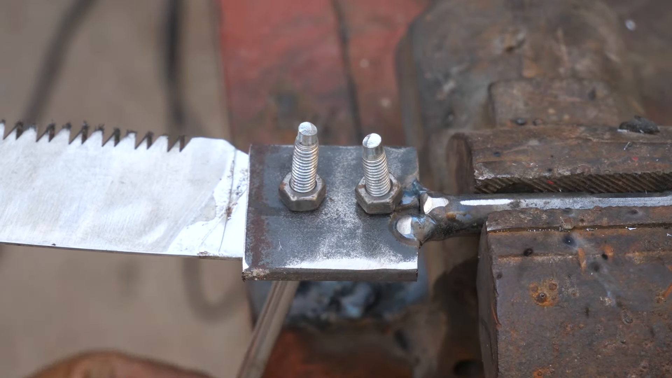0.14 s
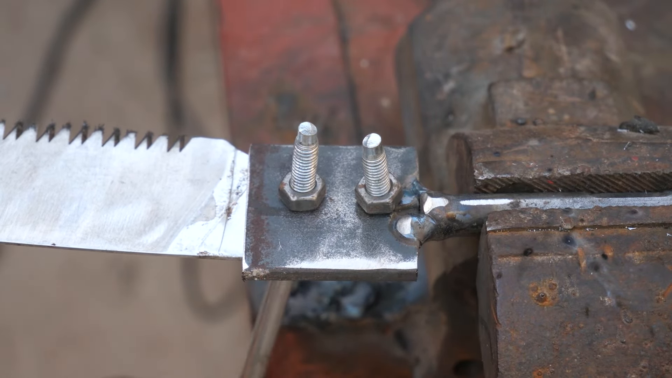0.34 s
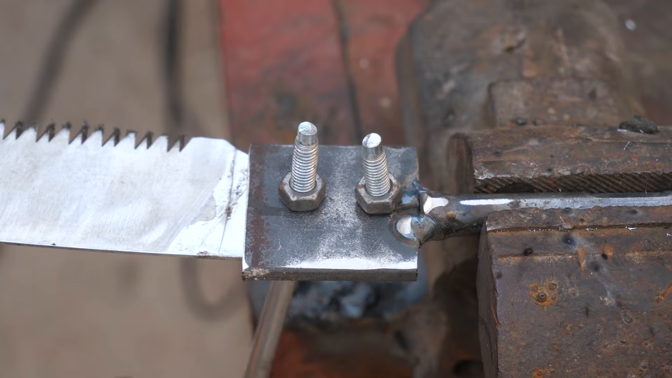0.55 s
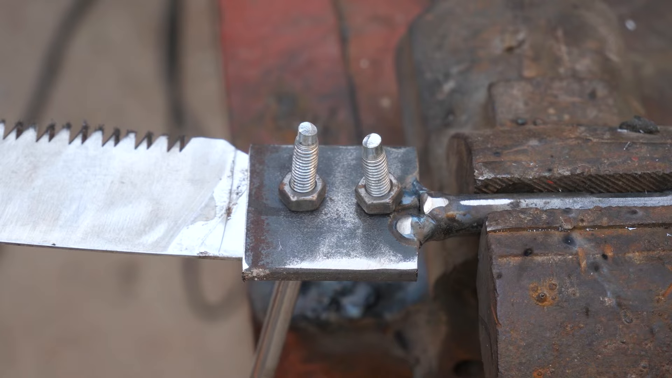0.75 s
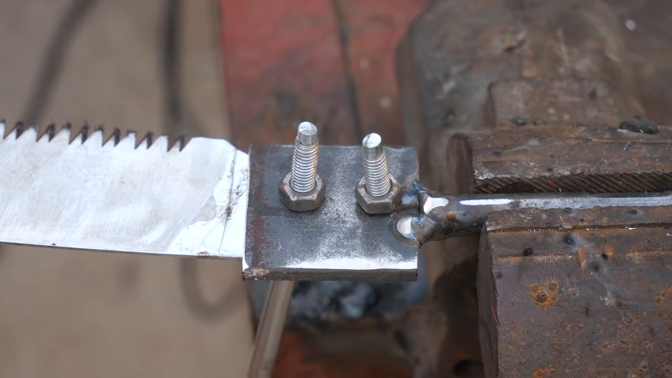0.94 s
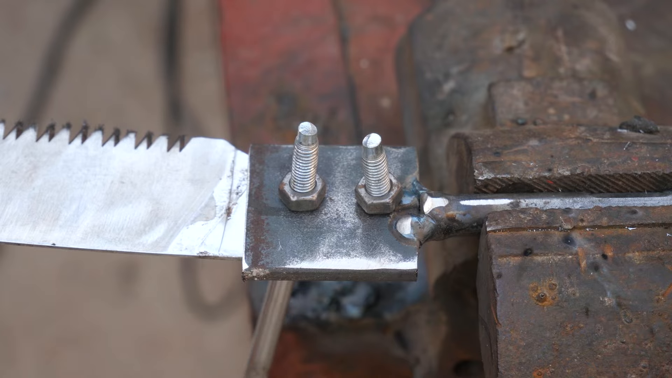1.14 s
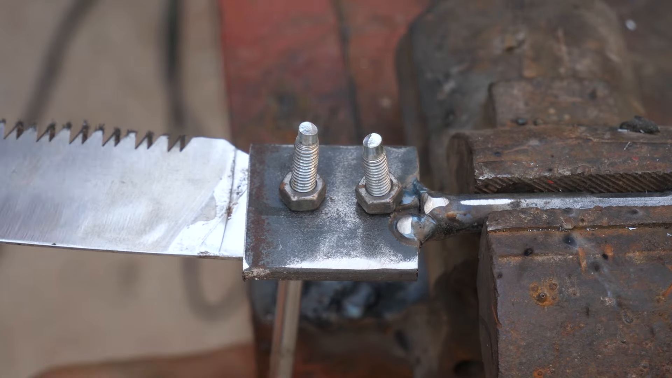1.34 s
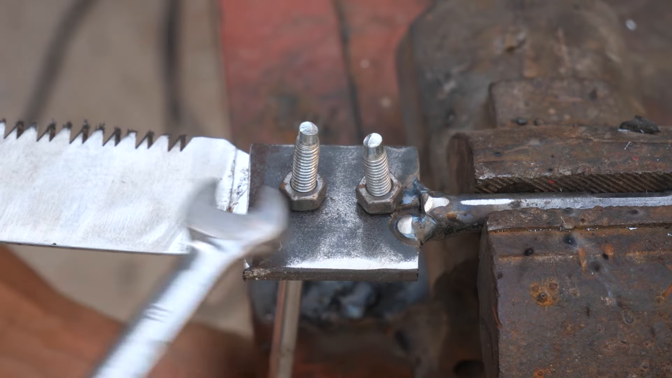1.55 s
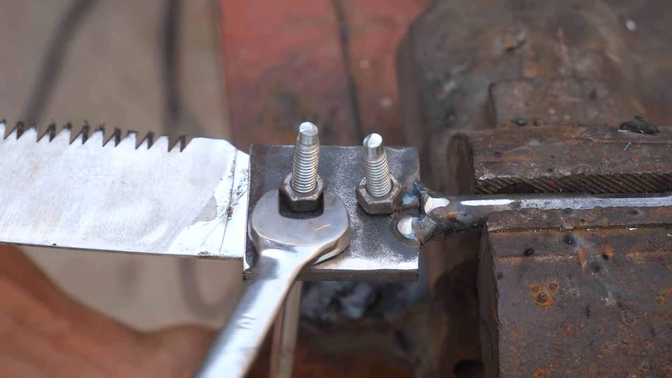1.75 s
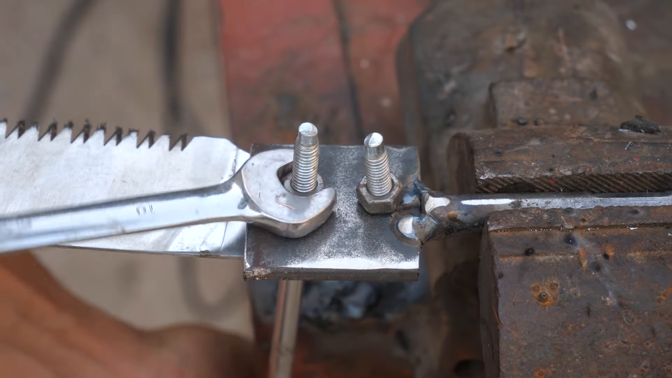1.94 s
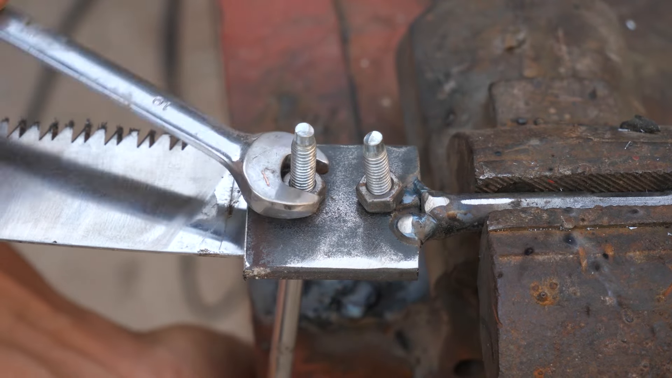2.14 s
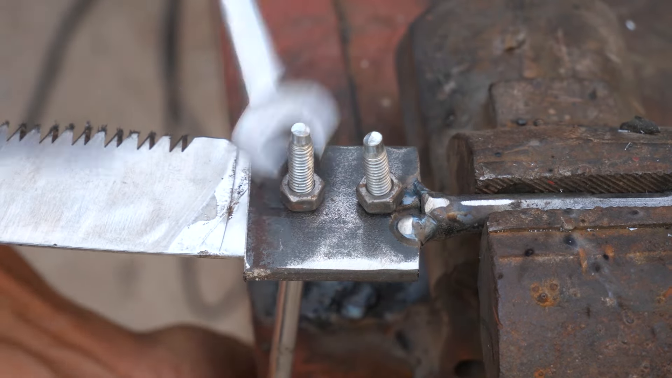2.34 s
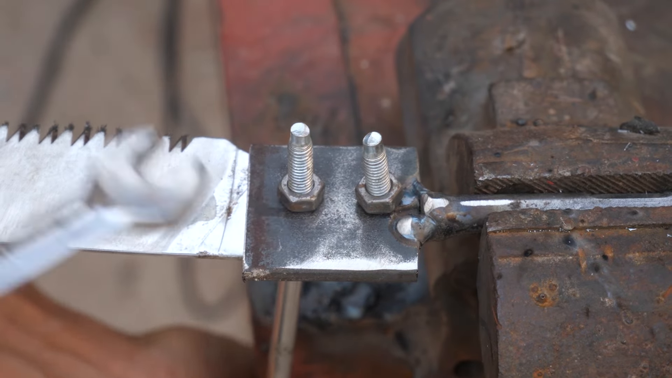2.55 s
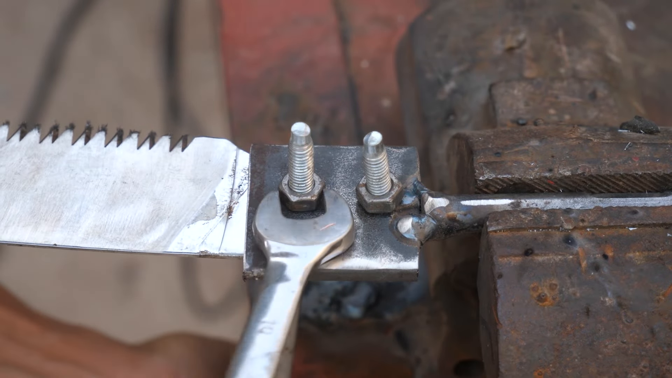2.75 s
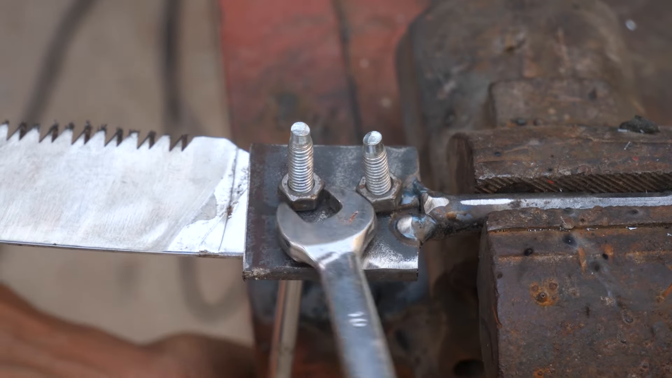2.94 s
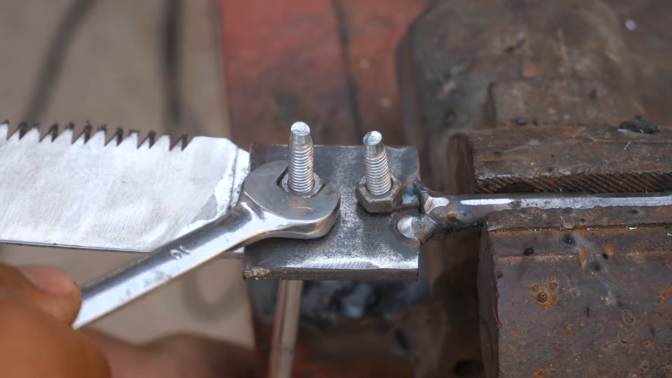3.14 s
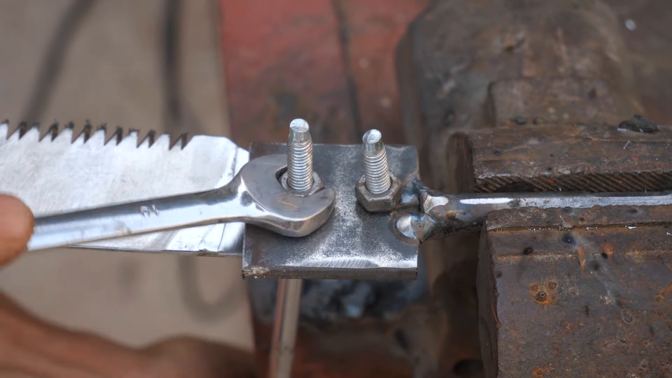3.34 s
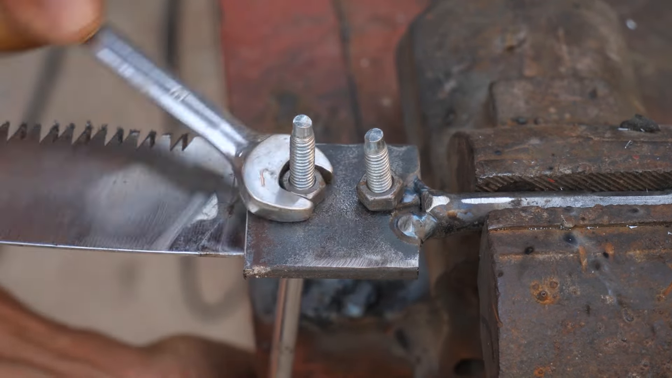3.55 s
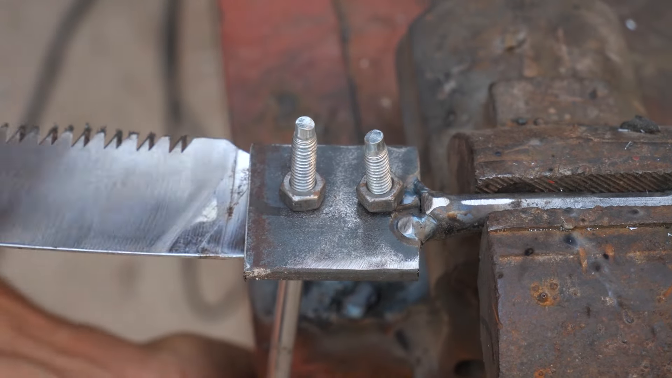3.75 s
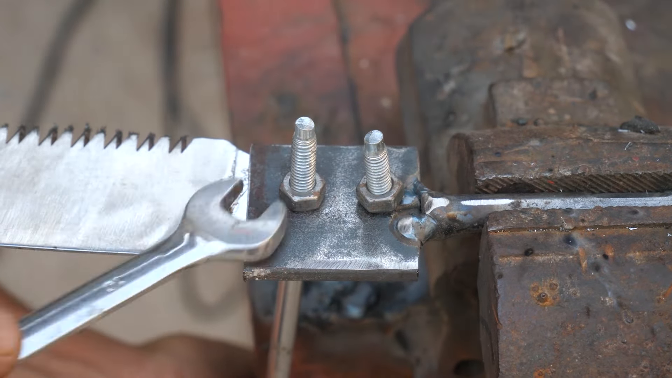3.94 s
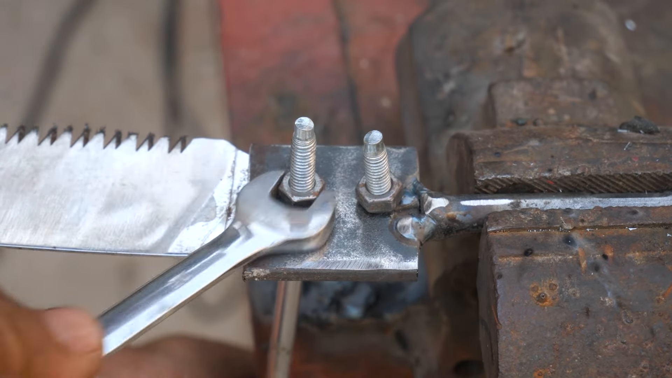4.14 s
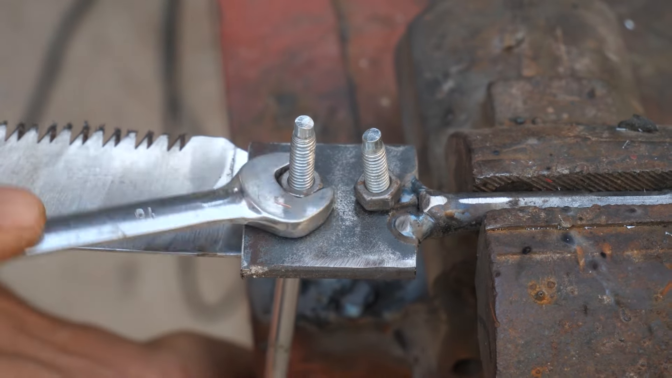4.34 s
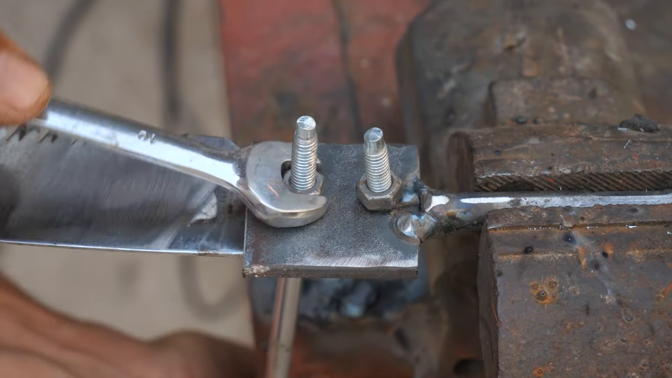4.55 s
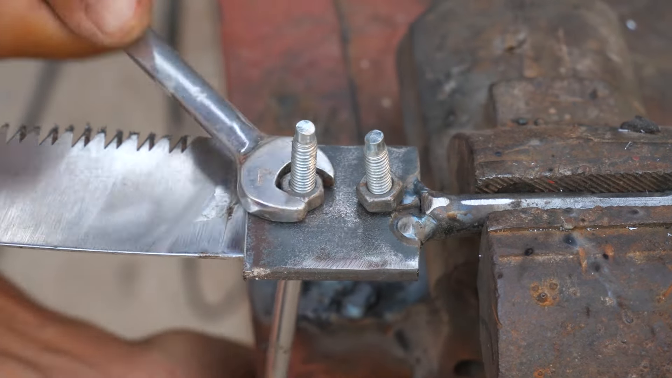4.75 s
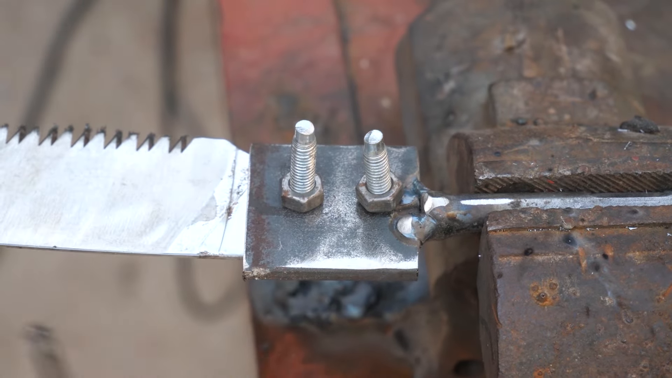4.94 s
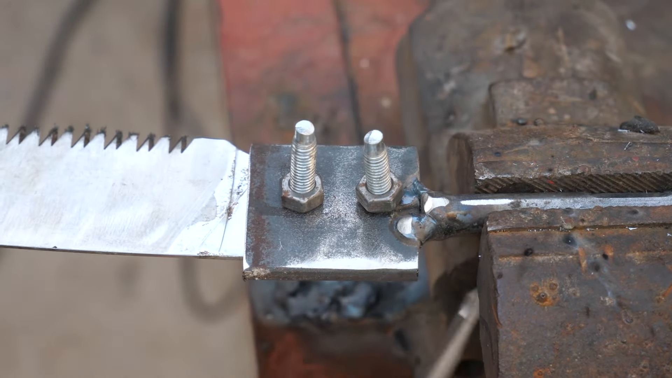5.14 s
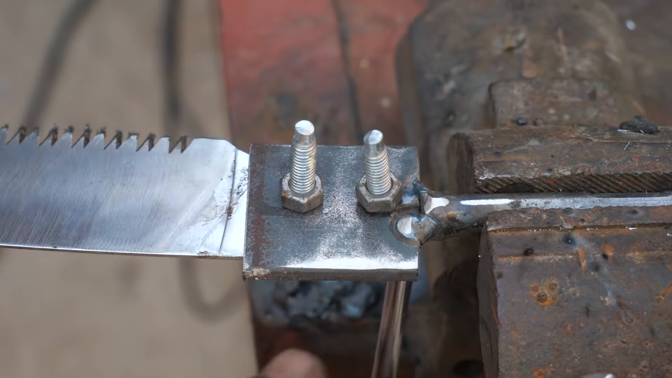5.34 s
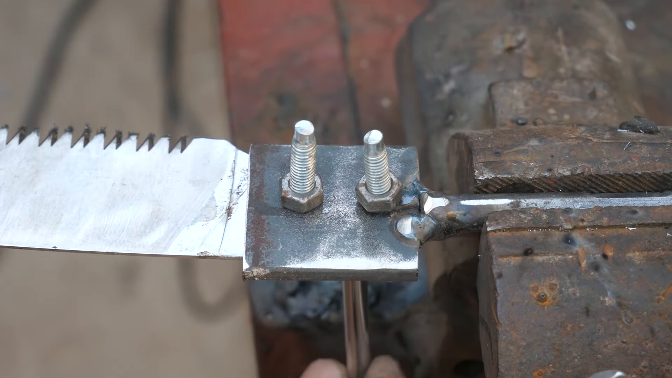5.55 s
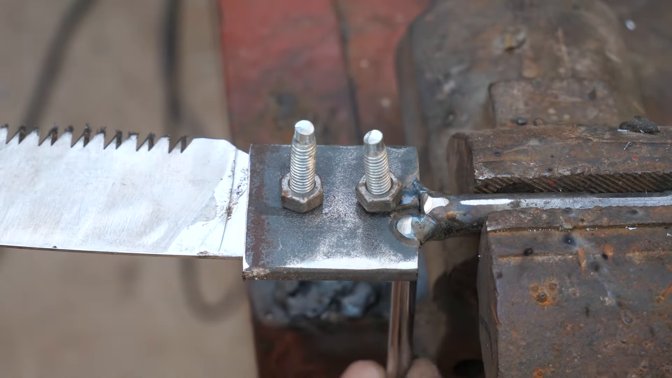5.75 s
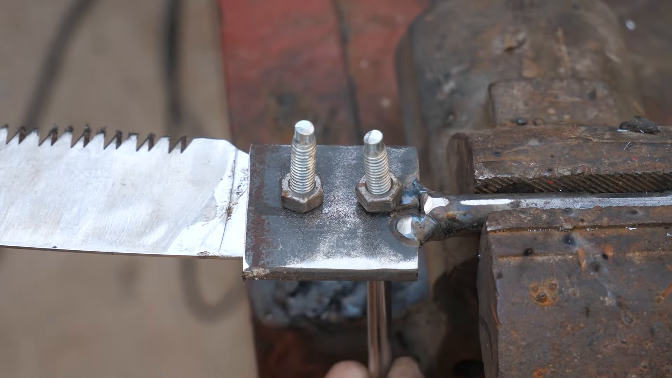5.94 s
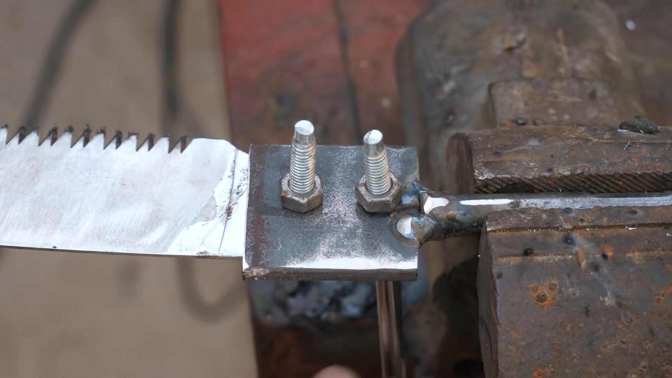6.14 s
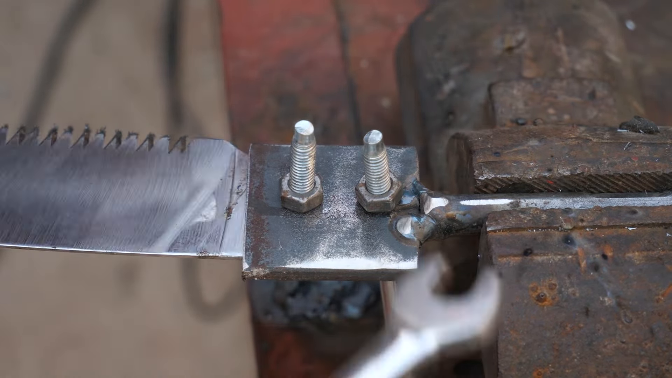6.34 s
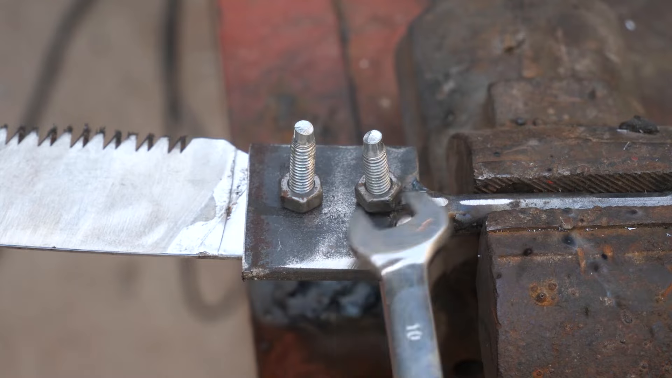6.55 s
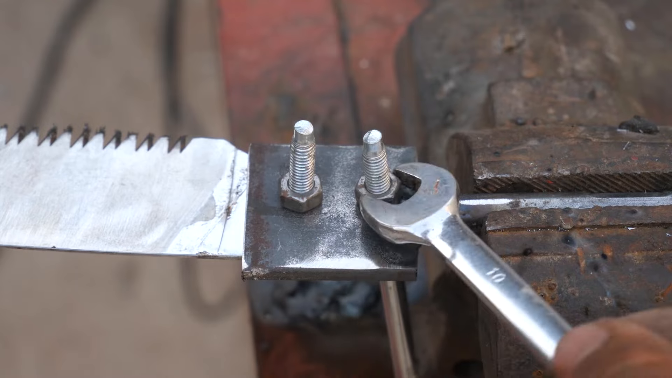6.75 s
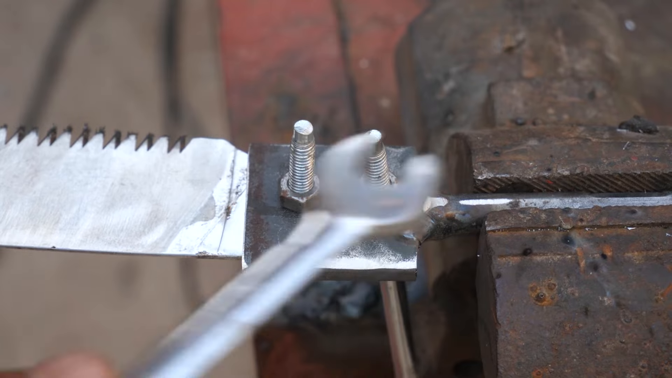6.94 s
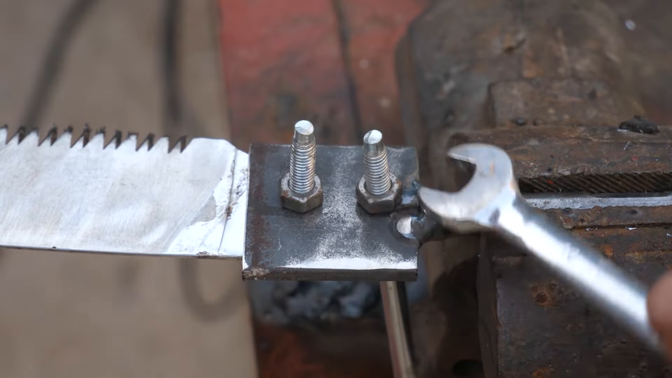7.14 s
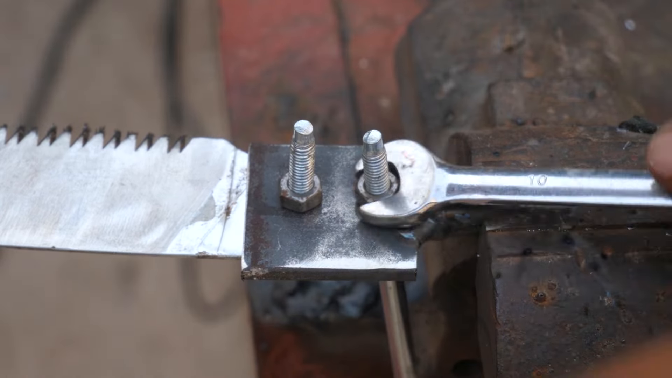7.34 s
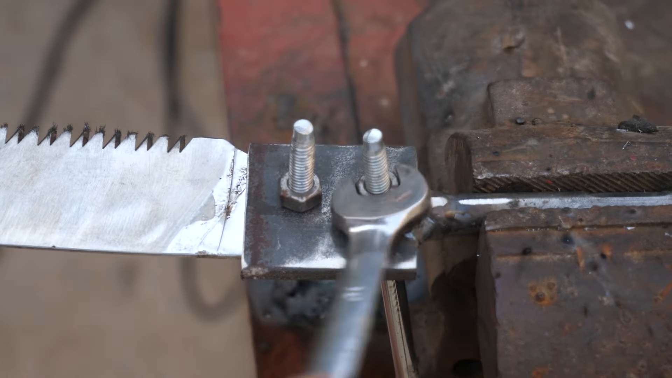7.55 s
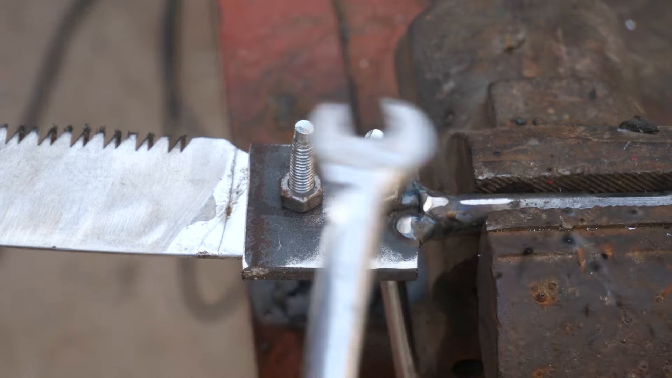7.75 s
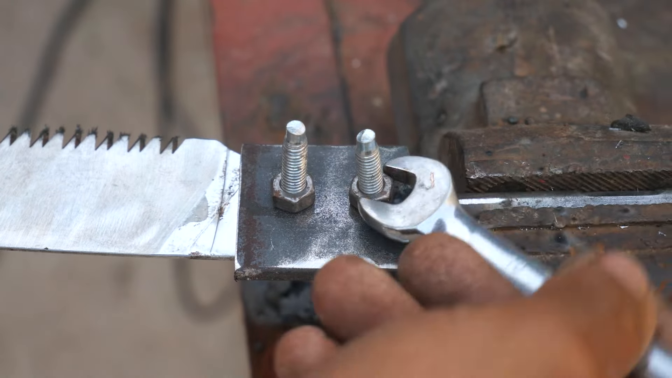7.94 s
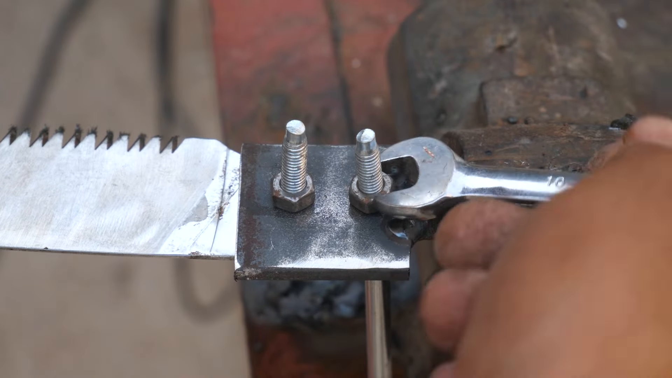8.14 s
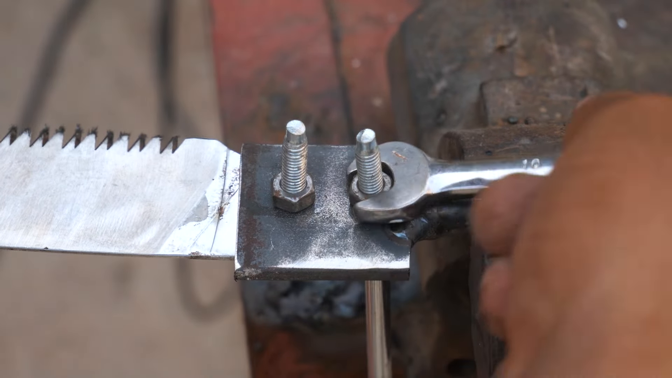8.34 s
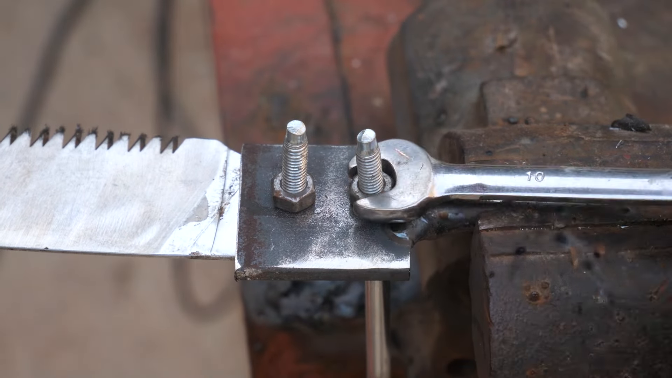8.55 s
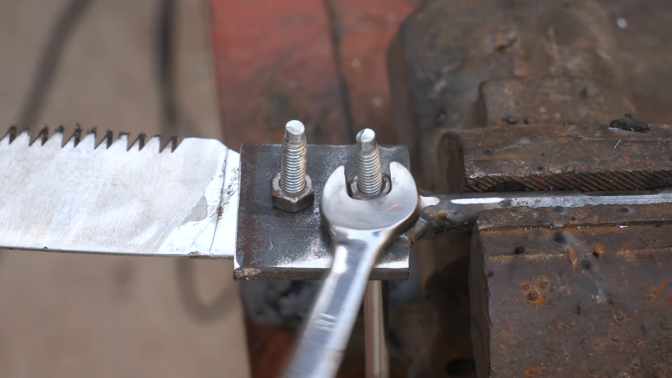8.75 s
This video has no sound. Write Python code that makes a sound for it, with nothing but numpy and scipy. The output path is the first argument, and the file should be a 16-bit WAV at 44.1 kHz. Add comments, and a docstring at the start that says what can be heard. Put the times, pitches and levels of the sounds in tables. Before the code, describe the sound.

Sharp steel clicks sound close to a stereo microphone throughout, as a spanner meets nuts and bolts on a small plate held in a vice. They come unevenly, singly or in quick clusters, and each rings briefly through plate, saw blade and spanner with a short workshop tail. The first taps are fairly light; harder clinks land at about 1.9, 3.2 and 4.2 seconds, with more near 5.1, 5.8 and 7 seconds. From about 7.2 to 7.5 seconds something is dragged roughly over the bench. At 7.8 seconds a very short, loud rattle cuts off abruptly with a low thump. Another hard clink follows at 8.3 seconds, then lighter taps until about 9 seconds. Soft wind puffs touch the microphone, mostly around 1.2 seconds and from 3.9 to 4.5 seconds. A faint hiss and the wavering hum of distant machines continue underneath.

```python
"""Sharp steel clicks close to the microphone: a spanner meets nuts and bolts in a small plate held in a vice.
Plate, saw blade and spanner ring briefly, and the workshop answers with a short tail. Seven seconds in,
something is dragged over the bench; then a short loud rattle ends abruptly at 7.85 s with a low thump, and the
background drops. Wind puffs at the stereo microphone, over its hiss and the hum of distant machines."""
import sys
import numpy as np
from scipy import signal
from scipy.fft import rfft, irfft, next_fast_len
from scipy.io import wavfile

SR = 44100
rng = np.random.default_rng(int(sys.argv[2]) if len(sys.argv) > 2 else 0)


def bounce(signal):
    """Save signal as a 16-bit WAV file at the path given by the first command-line argument."""
    frames = np.transpose(np.atleast_2d(signal))
    limited = np.clip(frames, -1, 1)
    pcm = np.round(limited * 32767).astype(np.int16)
    wavfile.write(sys.argv[1], SR, pcm)


N = 392490

# Spanner contacts: t/s, level/dB, five part gains/dB (as in PART_COLOURS), three favoured f/Hz, decay/s
CONTACTS = [(0.108, -38.5, 0, -13, -17, -20, -18, 1450, 4080, 12400, 0.2),
            (0.1491, -31, -13, -14.5, -14.5, -17, -25.5, 2620, 5280, 6140, 0.48),
            (0.1857, -30, -7.5, -20, -17, -15, -17.5, 1460, 5440, 11100, 0.36),
            (0.382, -41, -19, -9, -7, -8, -17, 1950, 5280, 8240, 0.31),
            (0.4211, -20, -16, -13.5, -15.5, -14.5, -23, 2620, 5270, 6200, 0.26),
            (0.633, -41, -15, -8.5, -15, -18, -23, 1930, 4230, 8120, 0.64),
            (0.771, -20, -15.5, -22, -17, -13, -20, 2474, 5430, 6450, 0.24),
            (0.921, -27, -11.5, -11, -15.5, -18, -32, 2650, 5300, 6250, 0.38),
            (1.0265, -21.5, -12, -16.5, -15.5, -16, -24, 1910, 5280, 6170, 0.21),
            (1.1683, -23, -1.5, -16.5, -13.5, -22.5, -27, 2400, 4120, 7500, 0.24),
            (1.6561, -12.5, -23.5, -16.5, -15.5, -12, -27, 2010, 5270, 7100, 0.14),
            (1.696, -19.5, -23, -20, -14.5, -8, -25, 1970, 5040, 6700, 0.2),
            (1.728, -19, -15, -14, -14, -12, -18, 1910, 5060, 7350, 0.23),
            (1.7825, -14, -22, -18, -16, -16.5, -27, 2400, 5270, 7200, 0.28),
            (1.9079, -7.5, -18, -20, -17.5, -11.5, -16.5, 1700, 4700, 7100, 0.24),
            (2.043, -27.5, -9, -14.5, -14, -13, -14, 1710, 3650, 7060, 0.38),
            (2.152, -39, 0.5, -23, -19, -18, -12, 1430, 4450, 11300, 0.19),
            (2.423, -23, -19, -14, -11, -13, -16, 1934, 4830, 8400, 0.2),
            (2.61, -38, -2.5, -27, -15, -4, -9, 2150, 3860, 12000, 0.63),
            (2.6527, -35, -16, -24, -15, -10, -12, 1430, 3640, 6800, 0.42),
            (2.7035, -24.5, -17, -13.5, -9.5, -8.5, -9, 1950, 4240, 7780, 0.34),
            (2.7507, -25.5, -15, -11, -24, -8, -24, 1975, 4140, 6670, 0.13),
            (3.04, -21, -26, -14, -12.5, -19.5, -22, 1600, 4300, 6800, 0.18),
            (3.1958, -6, -33, -23.5, -17.5, -12, -16, 1800, 5270, 8330, 0.24),
            (3.7472, -27, -27, -21, -14.5, -10, -8, 1950, 4310, 6670, 0.18),
            (3.7695, -24.5, -16, -16, -14.5, -22, -27, 1890, 5240, 6600, 0.25),
            (4.0384, -18, -20, -16, -10.5, -18, -24, 1920, 4370, 6700, 0.15),
            (4.0639, -26, -16, -10.5, -16, -18, -32, 1950, 4260, 6200, 0.37),
            (4.2311, -9, -27, -15, -12.5, -9.5, -22, 1777, 4950, 8650, 0.13),
            (4.2828, -15.5, -23, -20.5, -13.5, -12, -24, 1810, 5100, 6570, 0.19),
            (4.3853, -37, -25, -23, -20, -17, -19, 1830, 5000, 6940, 0.19),
            (4.4757, -24, -15, -25, -28, -6, -5, 2000, 5000, 12500, 0.09),
            (4.497, -31, -24, -12, -14, -9, 2, 1900, 4800, 11300, 0.1),
            (4.8354, -25, -14.5, -19.5, -19, -15.5, -18, 1810, 4300, 9440, 0.7),
            (5.1363, -16.5, -36, -27, -15.5, -10.5, -15.5, 2580, 5270, 12700, 0.26),
            (5.2374, -22.5, -37, -25, -13, -10.5, -14, 2470, 5600, 6300, 0.2),
            (5.3943, -31.5, -14, -18.5, -20, -18, -24, 2400, 5400, 9300, 0.31),
            (5.466, -22.5, -10, -20, -17, -19, -14, 1370, 5270, 9500, 0.19),
            (5.475, -21.5, -15, -15.5, -17, -14, -16, 1940, 5270, 9290, 0.26),
            (5.6354, -21, -29, -18.5, -10, -12, -18, 2500, 5280, 7040, 0.24),
            (5.7516, -13, -26, -23, -18.5, -16, -12, 1904, 5280, 9900, 0.16),
            (5.8022, -21.5, -18, -15, -11, -11.5, -35, 2410, 5270, 6400, 0.27),
            (5.8844, -36, -17, -22, -28, -11, -14, 2470, 4830, 6860, 0.23),
            (5.9108, -34, 0.5, -11, -13, -16, -21, 2440, 4100, 6090, 0.28),
            (6.0684, -35.5, -4.5, -12, -13, -20, -21, 2400, 5270, 7590, 0.27),
            (6.1766, -20.5, -26.5, -23, -21, -16, -15, 1900, 5230, 7700, 0.33),
            (6.2993, -23.5, -22, -18, -12.5, -12.5, -8, 2380, 5300, 10000, 0.2),
            (6.593, -40.5, 6.5, -7.5, -25, -21, -23, 1430, 3950, 9970, 0.32),
            (6.6844, -29.5, -26, -9.5, -10, -12, -21, 2400, 4300, 7400, 0.22),
            (6.715, -19.5, -15, -21.5, -22, -2, -10, 2400, 4000, 14200, 0.3),
            (6.8531, -15.5, -17, -16, -18.5, -15, -18, 1850, 5270, 7400, 0.26),
            (6.9718, -13, -22, -19.5, -17, -5.5, -7, 2620, 4130, 7750, 0.26),
            (7.2776, -31, -13, -7, -19, -9, -18, 1600, 5280, 8260, 0.17),
            (7.3294, -33, -16, 1, -17, -21, -24, 1970, 4610, 8820, 0.63),
            (7.4078, -24.5, -6.5, -10, -13.5, -22, -19, 1960, 4200, 7980, 0.44),
            (7.6722, -23.5, -10.5, -13, -13, -5.5, -8, 1920, 3960, 9970, 0.18),
            (7.7406, -32, -26, -12, -10, -14, -19, 1900, 4240, 7810, 0.67),
            (8.0631, -43.5, 5.5, -9.5, -16, -22, -30, 1560, 3770, 6380, 0.67),
            (8.3192, -7.5, -17.5, -20.5, -10, -9.5, -9.5, 2270, 4350, 6160, 0.34),
            (8.5856, -25, -15, -19, -15.5, -17.5, -20, 2040, 4530, 6350, 0.38),
            (8.6278, -36.5, 2.5, -8.5, -17, -21, -26, 1640, 4250, 6550, 0.39),
            (8.8006, -27.5, -12, -15.5, -13.5, -15, -17, 2060, 4470, 9780, 0.36),
            (8.8857, -29.5, -8, -20, -6, -13, -6, 1630, 3660, 6900, 0.31)]
# Modes of plate, blade and spanner: f/Hz, level/dB, t60/s
STEEL_MODES = [(1125, -5, .7), (1350, -9, .7), (1600, -9, .6), (1809, 0, .9), (1950, 0, .6), (2401, 0, .8),
               (2650, -3, .6), (3050, -14, .4), (3741, -10, .4), (4250, -5, .4), (4527, -7, .4),
               (4800, -7, .4), (5270, -7, .4), (5600, -10, .3), (5954, -11, .3), (6450, -9, .35),
               (6700, -8, .35), (7220, -10, .3), (7779, -9, .3), (8000, -7, .4), (8600, -9, .4),
               (9300, -10, .3), (9636, -8, .5), (9970, -8, .4), (11280, -5, .45), (11910, -12, .3),
               (12700, -10, .3), (13130, -9, .3), (14100, -7, .35), (15300, -8, .3)]
# One list each for vice knock, plate, shank, jaws and top fizz: f/Hz, level/dB
PART_COLOURS = [
    [(300, -14.5), (800, 3.5)],
    [(1800, 2), (2700, -0.5)],
    [(3300, -6.5), (4800, 4.5)],
    [(8000, 0)],
    [(13000, 1.5), (16000, -14)],
]
# Spectrum of the steel's wash of small modes, and the crack's added brightness: f/Hz, level/dB
WASH_COLOUR = [(500, 14.5), (2000, 6.5), (3200, 8.5), (5000, -5.5), (8300, -3.5), (9200, -11.5),
               (11000, -10), (15000, -3)]
CRACK_COLOUR = [(1000, -4), (5000, 12.5), (9000, 15), (16000, 17)]
# Workshop reverberation: f/Hz, t60/s
ROOM_DECAY = [(500, 0.48), (3000, 0.17), (12000, 0.12)]
# Drag strokes: start t/s, loudest t/s, end t/s, start level/dB, peak level/dB, mid/dB, treble/dB
DRAG_STROKES = [(7.196, 7.222, 7.27, -46.5, -41, 4.5, -5.5), (7.219, 7.268, 7.34, -42, -36, -6, -13.5),
                (7.304, 7.396, 7.48, -42.5, -25.5, -9, -7), (7.763, 7.817, 7.825, -43, -32, -17, -12)]
# Bench resonances: f/Hz, width/Hz, level/dB
BENCH_MODES = [(540, 60, 0), (780, 60, -3), (900, 90, -3), (1277, 22, 5), (1650, 60, -4), (1970, 80, -2),
               (2400, 150, -3), (2700, 120, -5)]
# Spectrum of the short loud rattle: f/Hz, level/dB
RATTLE_COLOUR = [(30, -14), (80, -12), (150, -22), (372, -12), (529, -1), (896, -3), (1150, -11),
                 (1300, -4), (1630, -10), (1810, -4), (2700, -9), (3060, -16), (7170, -24), (16000, -37)]
# Single puffs on the microphone: t/s, level/dB, f/Hz
WIND_PUFFS = [(0.154, -40, 583), (0.863, -39, 342), (0.881, -29, 465), (0.906, -37, 340), (0.923, -30, 307),
              (1.083, -36, 607), (1.097, -34, 270), (1.122, -35, 400), (1.151, -21, 536), (1.156, -17, 524),
              (1.168, -17.5, 542), (1.178, -18, 713), (1.192, -21, 730), (1.237, -19, 360),
              (1.246, -20.5, 450), (1.302, -36, 365), (1.637, -24, 495), (1.903, -29, 650),
              (2.068, -33, 637), (2.459, -35, 460), (2.512, -34, 453), (2.573, -29, 436), (2.592, -32, 460),
              (2.624, -20, 520), (2.635, -29, 313), (3.633, -32, 295), (3.89, -21.5, 355),
              (3.909, -23, 350), (3.947, -23.5, 383), (3.963, -27, 420), (4.02, -24, 396), (4.09, -32, 369),
              (4.164, -26, 353), (4.184, -14, 546), (4.322, -21, 410), (4.453, -24, 296), (4.477, -32, 626),
              (4.505, -31, 428), (4.525, -26, 350), (4.595, -37, 353), (4.853, -27, 395),
              (7.671, -41.5, 332), (8.039, -22.5, 310), (8.049, -25, 422)]
# Strength of the buffeting: t/s, level/dB
WIND_LEVEL = [(0, -56), (.77, -53), (1.06, -47.5), (1.91, -45), (2.25, -57), (2.63, -47.5), (3, -50),
              (3.74, -50), (3.94, -40), (4.39, -44), (4.51, -49.5), (4.98, -48.5), (5.3, -52.5),
              (6.32, -52.5), (6.79, -50.5), (7.36, -51), (7.81, -48), (8.9, -45)]
# Spectrum of the buffeting: f/Hz, level/dB
WIND_COLOUR = [(60, -9), (150, -16.5), (250, -4.5), (330, -3.5), (450, -0.5), (650, -9), (900, -13.5),
               (1400, -24.5), (2500, -47)]
# Background of the workshop: t/s, hum level/dB, hiss level/dB
BACKGROUND_LEVELS = [(0, -48.5, -58), (.42, -52.5, -62.5), (1.7, -52.5, -58), (2.3, -54, -59.5),
                     (2.8, -50, -57), (3.64, -56, -60.5), (5.85, -51.5, -59.5), (6.67, -54, -59),
                     (7.75, -45, -54.5), (7.9, -57, -63.5), (8.9, -51.5, -62)]
# Wavering machine tones: f/Hz, width/Hz, level/dB
MACHINE_TONES = [(315, 27, -54), (658, 3.6, -62.5)]
# A hum near 450 Hz that comes and goes: t/s, level/dB, length/s
HUM_SWELLS = [(1.203, -44, 0.16), (2.635, -45, 0.47), (3.867, -45.5, 0.19), (4.313, -56, 0.49),
              (5.003, -46.5, 0.27), (6, -55, 1), (8.25, -52, 0.33)]
# Spectra of the machine hum, the microphone's hiss and its airy top: f/Hz, level/dB
HUM_COLOUR = [(30, -26), (100, -22), (200, -34), (325, 5), (450, -6), (650, 1.5), (800, -10), (1000, -1.5),
              (1500, -9.5), (2200, -10.5), (3000, -27), (5000, -89)]
HISS_COLOUR = [(1500, 2.5), (2800, 4.5), (3700, 2.5), (5000, -1), (7000, 1), (8200, -2), (9500, -36),
               (12000, -35)]
AIR_COLOUR = [(6000, -32), (9000, 1), (11000, -2.5), (13000, -2.5), (15500, 0), (16000, -20), (16600, -30)]
# Likeness of the microphone's two ports: f/Hz, correlation
PORT_LIKENESS = [(100, 0.81), (250, 1), (500, 1), (1000, 0.99), (2000, 0.91), (5000, 0.71), (8000, 0.83),
                 (12000, 0.36)]
# Left port over right: f/Hz, level/dB
PORT_BALANCE = [(60, 3), (140, -4), (240, -0.5), (950, -0.5), (3770, -1.0), (15000, -0.5)]


def steel_modes(t, split_hz=30, side_db=-6):
    """Each mode is a close triplet that beats; gives the centre pitches and the decaying waves."""
    hz, mode_db, t60 = np.repeat(STEEL_MODES, 3, axis=0).T[:, :, None]
    offsets = np.tile([-1, 0, .8], len(STEEL_MODES))[:, None]
    triplet_db = np.tile([side_db, 0, side_db], len(STEEL_MODES))[:, None]
    split = hz + split_hz * (hz / 2000) ** .5 * offsets
    waves = amp(mode_db + triplet_db - 60 * t / t60) * np.exp(2j * np.pi * split * t)
    return hz[:, 0], np.concatenate([waves.real, waves.imag])


def spanner(crack_db=-4, wash_db=-4, thump_db=-40, favour_db=9, scatter_db=4, rise_s=0.0025):
    """Close up, each contact cracks, rings the steel's modes and leaves a wash of countless small ones."""
    out, t = np.zeros((2, N)), np.arange(12000) / SR
    hz, modes = steel_modes(t)
    fade = np.clip((t[-1] - t) / .05, 0, 1)
    crack_shape = amp(crack_db - 60 * t[:400] / 0.014) * np.clip(t[:400] / 0.0018, 0, 1)
    for s, db, *row, decay_s in CONTACTS:
        parts_db, favoured = row[:5], row[5:]  # the struck spot favours a few modes
        tone = coloured([(f, g + gain) for part, gain in zip(PART_COLOURS, parts_db) for f, g in part])
        scatter = scatter_db * np.repeat(rng.standard_normal(len(STEEL_MODES)), 3)
        strength = amp(favour_db * nearness(hz, favoured, .025) + scatter)
        phase = 2 * np.pi * rng.random((2, len(hz)))
        ring = np.hstack([strength * np.cos(phase), strength * np.sin(phase)]) @ modes / 5
        wash_gain = lambda f: amp(along(WASH_COLOUR, f) + favour_db * nearness(f + 1, favoured, .063))
        grit = amp(0.5 * np.interp(t, np.arange(100) * 0.0043, rng.standard_normal(100)))  # loose parts
        wash = filtered(grit * rng.standard_normal((2, len(t))), wash_gain) * amp(-15 * t / decay_s)
        grip = fade * amp(-40 * t / decay_s) * (1 - np.exp(-t / rise_s))  # hand and jaws damp the steel
        sound = spread(grip * (ring + amp(wash_db) * wash), tone)
        crack = crack_shape * rng.standard_normal(400)
        crack_gain = lambda f: tone(f) * wash_gain(f) ** 0.68 * amp(along(CRACK_COLOUR, f))
        sound[:, :400] += unit(filtered(crack, crack_gain)) * np.std(crack)
        sound[:, :200] += amp(thump_db) * np.hanning(200)  # a faint low thump under each click
        add(out, s, amp(db) * sound)
    return out


def bench_response(f):
    """The bench's resonances stand on a flat floor that falls away in the bass."""
    modes = sum(amp(db) * f * width / (hz * hz - f * f + 1j * f * width) for hz, width, db in BENCH_MODES)
    return amp(-23) / (1 + (350 / (f + 1)) ** 4) + abs(modes)


def drag(fade_db_per_s=158):
    """Rough rubbing excites the bench's resonances and a broad hiss; each stroke swells, then fades."""
    out = np.zeros((2, N))
    body_gain = lambda f: bench_response(f) / (1 + (f / 1500) ** 8)
    mid_gain = lambda f: bench_response(f) / (1 + (1500 / (f + 1)) ** 8) / (1 + (f / 3000) ** 6)
    treble_gain = coloured([(2500, -6.5), (3600, -2.5), (7000, -9), (9000, -17), (16000, -23)])
    for start, loudest, end, start_db, peak_db, mid_db, treble_db in DRAG_STROKES:
        t = np.arange(round((end - start) * SR)) / SR
        db = np.interp(t, [0, loudest - start], [start_db, peak_db])
        db -= fade_db_per_s * np.maximum(t + start - loudest, 0)
        gate = np.clip(t / 0.003, 0, 1) * np.clip((end - start - t) / 0.008, 0, 1)
        body = rush(body_gain, 0.67, 58, len(t))
        mid = amp(mid_db) * rush(mid_gain, 1.8, 192, len(t))
        treble = amp(treble_db) * rush(treble_gain, 2.3, 307, len(t))
        add(out, start, gate * amp(db) * (body + mid + treble))
    return out


def rattle(start=7.8212, end=7.8493, rattle_db=-14.5, fall_db=7.2, thump_db=-19.5, ring_db=-40.5):
    """A short loud rattle that stops abruptly, with a low thump at its end; one faint pitch rings on."""
    out, t = np.zeros((2, N)), np.arange(round((end - start) * SR)) / SR
    gate = np.clip(t / 0.00026, 0, 1) * np.clip((end - start - t) / 0.00015, 0, 1)
    burst = rush(coloured(RATTLE_COLOUR), 2.5, 600, len(t))
    add(out, start, gate * amp(rattle_db - fall_db * t / (end - start)) * burst)
    add(out, end - .004, amp(thump_db) * np.tile(np.hanning(300), (2, 1)))
    t = np.arange(SR // 6) / SR
    mode = coloured([(1200, -62), (1500, -20), (1620, 5), (1700, 9), (1850, -36), (2300, -70)])
    add(out, end, amp(ring_db - 60 * t / 0.27) * rush(mode, size=len(t)))
    return out


def wind():
    """Air right on the microphone: lumpy buffeting, and single puffs a few cycles long."""
    db, = curves(WIND_LEVEL)
    out = amp(db) * rush(coloured(WIND_COLOUR), 3, 60)
    t = np.arange(SR // 40) / SR
    for s, puff_db, hz in WIND_PUFFS:
        rise_cycles = np.clip(0.95 - 0.39 * (puff_db + 30), .7, 3)  # harder puffs rise faster
        age = t * hz / rise_cycles
        puff = (age * np.exp(1 - age)) ** 2 * np.sin(2 * np.pi * hz * t) * rng.choice([-1, 1])
        push = age * np.exp(-age)
        puff -= np.sum(puff) * push / np.sum(push)  # no net push is left
        add(out, s, amp(puff_db) * np.array([puff, puff]))
    return out


def room(x):
    """The workshop answers the steel; the treble dies first."""
    hz, t, noise = signal.stft(rng.standard_normal((2, SR // 2)), SR, nperseg=256)
    decay = amp(-60 * t / along(ROOM_DECAY, hz)[:, None])
    tail = signal.istft(noise * decay, SR, nperseg=256)[1]
    tail = spread(tail, lambda f: f > 0)
    return signal.fftconvolve(x.mean(0)[None], tail / np.linalg.norm(tail[0]), axes=1)[:, :N]


def machines_and_hiss(air_db=-8):
    """Distant machines hum and waver; the microphone adds its own hiss."""
    t = np.arange(N) / SR
    hum_db, hiss_db = curves(BACKGROUND_LEVELS)
    hum = amp(hum_db) * rush(coloured(HUM_COLOUR), 0.97, 42)
    hiss = rush(coloured(HISS_COLOUR), 0.98, 30)
    air = amp(air_db) * rush(coloured(AIR_COLOUR), 0.28, 5.6)
    tone = lambda hz, width, flutter_db: rush(lambda f: 1 / (1 + ((f - hz) / width) ** 2), flutter_db, 3.29)
    drone = sum(amp(db) * tone(hz, width, 4.5) for hz, width, db in MACHINE_TONES)
    swell = sum(amp(db) * np.exp(-(2 * (t - s) / length) ** 2) for s, db, length in HUM_SWELLS)
    return hum + drone + swell * tone(456, 18, 0.88) + amp(hiss_db) * (hiss + air)


def amp(db):
    return 10 ** (np.asarray(db) / 20)


def unit(x):
    return x / np.sqrt(np.mean(x ** 2) + 1e-20)


def along(points, hz):
    """Reads (f/Hz, value) points on a log axis."""
    f, v = np.transpose(points)
    return np.interp(np.log(hz + 1), np.log(f + 1), v)


def coloured(spectrum):
    return lambda hz: amp(along(spectrum, hz))


def nearness(hz, pitches, width):
    """1 at any of the pitches, falling to 0 away from them."""
    return np.minimum(1, sum(np.exp(-(np.log(hz / f) / width) ** 2) for f in pitches))


def curves(rows):
    """One value per sample for each column after the time."""
    s, *cols = np.transpose(rows)
    return [np.interp(np.arange(N) / SR, s, c) for c in cols]


def filtered(x, response):
    """Weights the spectrum of x by a response of frequency."""
    n = x.shape[-1]
    m = next_fast_len(n + 4096)
    return irfft(rfft(x, m) * response(np.fft.rfftfreq(m, 1 / SR)), m)[..., :n]


def spread(pair, gain):
    """Two unrelated signals, filtered and mixed to be as alike as the two ports hear them."""
    turn = lambda hz: np.arccos(along(PORT_LIKENESS, hz)) / 2
    mid, side = filtered(pair, lambda hz: gain(hz) * [np.cos(turn(hz)), np.sin(turn(hz))])
    return np.array([mid + side, mid - side])


def rush(gain, flutter_db=0, rate=30, size=N):
    """Stereo noise of rms 1 whose level flutters, rate turns a second."""
    flutter = np.interp(np.arange(size) * rate / SR, np.arange(4096), rng.standard_normal(4096))
    return unit(amp(flutter_db * flutter) * spread(rng.standard_normal((2, size)), gain))


def add(out, s, sound):
    """Lays a stereo sound into out at time s."""
    part = out[:, round(s * SR):][:, :sound.shape[1]]
    part += sound[:, :part.shape[1]]


def scene(room_db=-8.5):
    """The workshop as heard from the bench; only the steel feeds the room."""
    steel = spanner()
    return steel + amp(room_db) * room(steel) + drag() + rattle() + wind() + machines_and_hiss()


def record(dry, bass_hz=200, top_hz=17000):
    """The microphone thins the bass and cuts the very top; its left port is mostly a little weaker."""
    bass_cut = lambda hz: amp(-25) + 1 / (1 + (bass_hz / (hz + 1)) ** 4)
    balance = lambda hz: amp(np.array([[.5], [-.5]]) * along(PORT_BALANCE, hz))
    return filtered(dry, lambda hz: bass_cut(hz) * balance(hz) * (hz < top_hz))


dry = scene()
out = record(dry)
bounce(out)
```